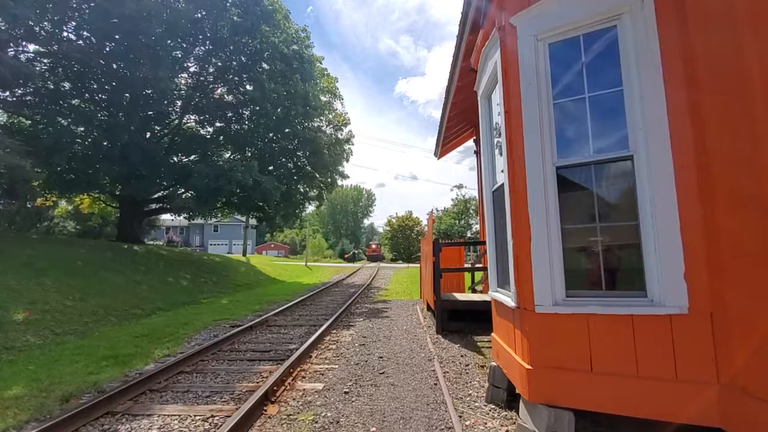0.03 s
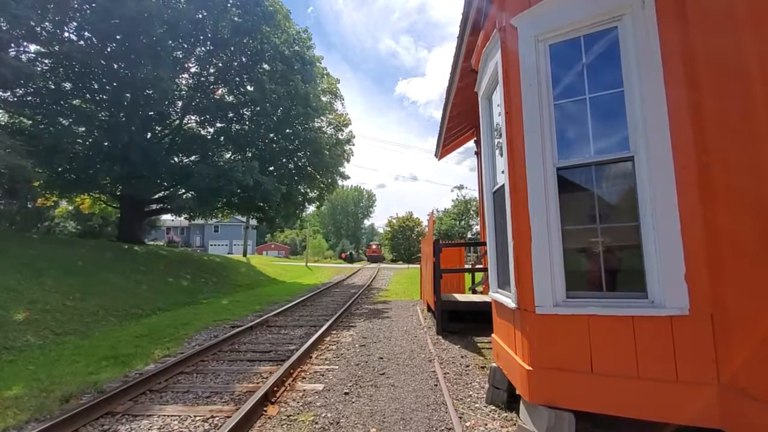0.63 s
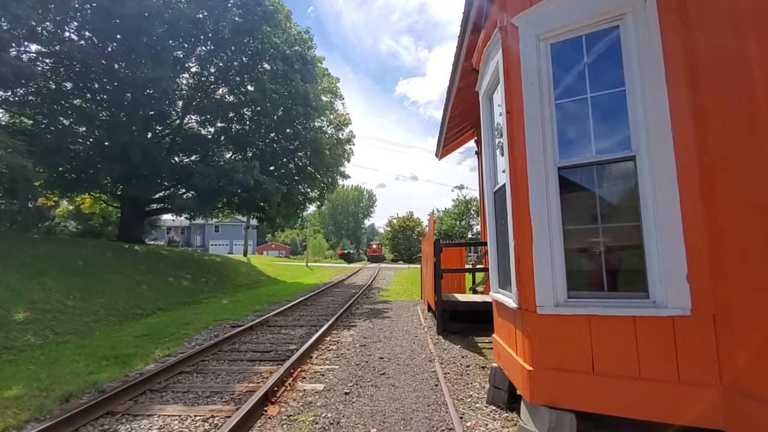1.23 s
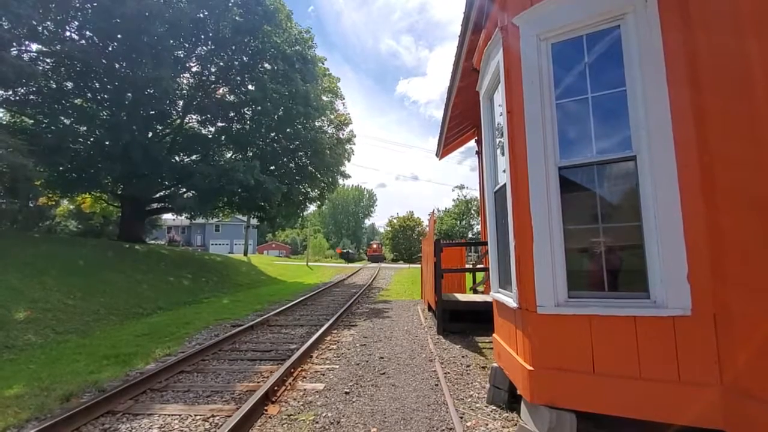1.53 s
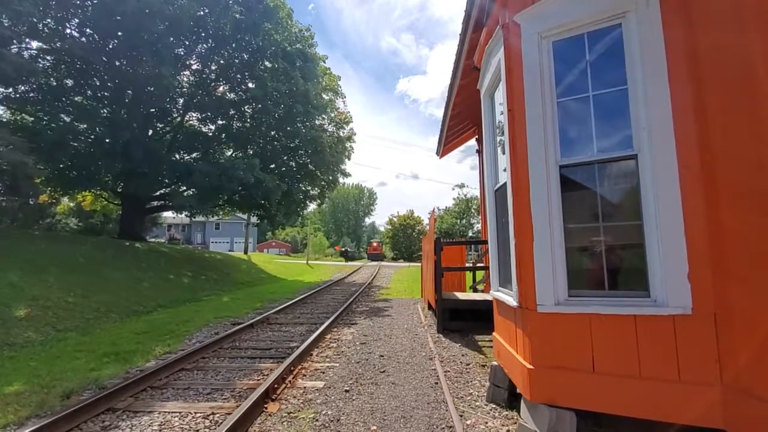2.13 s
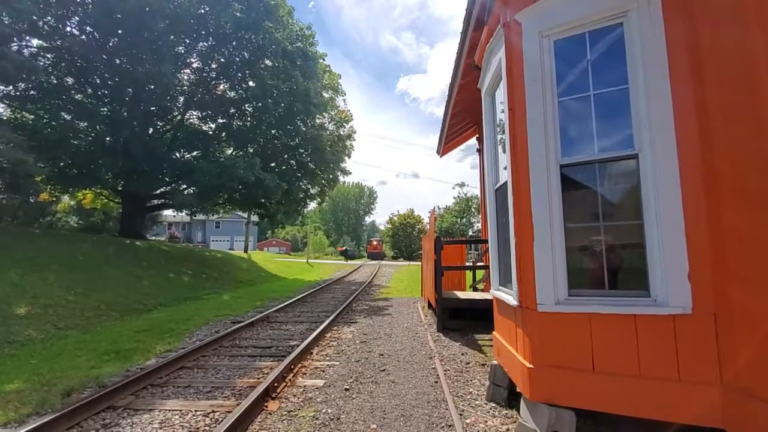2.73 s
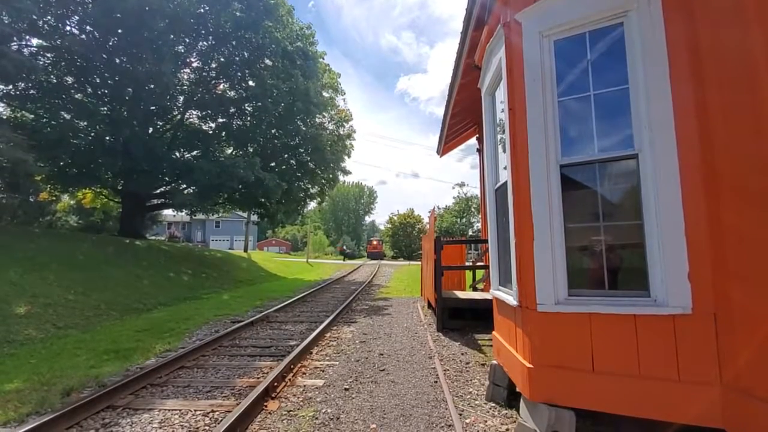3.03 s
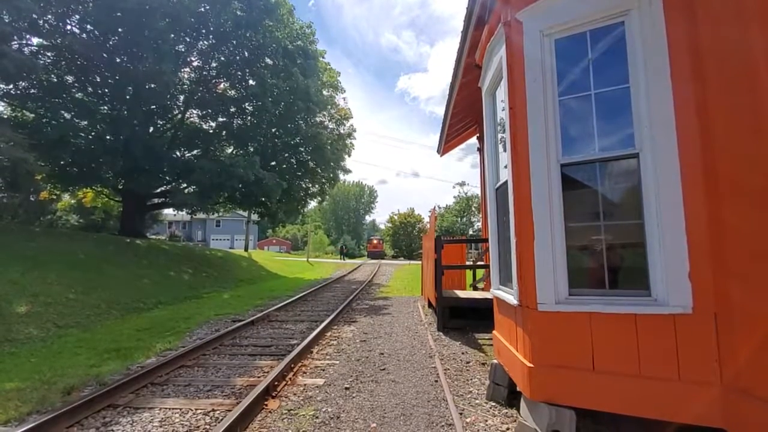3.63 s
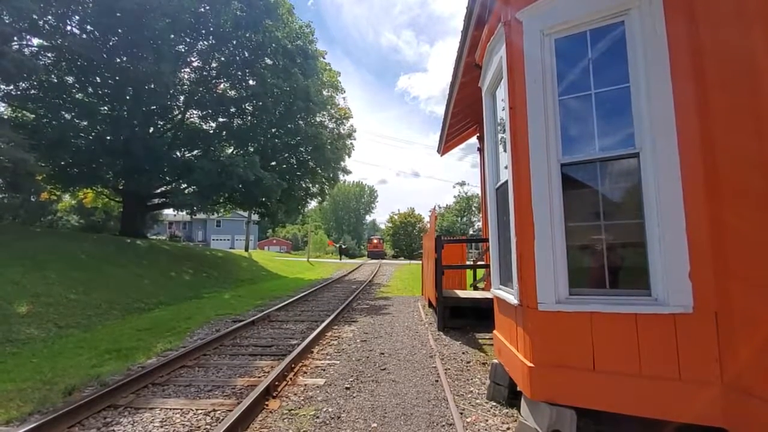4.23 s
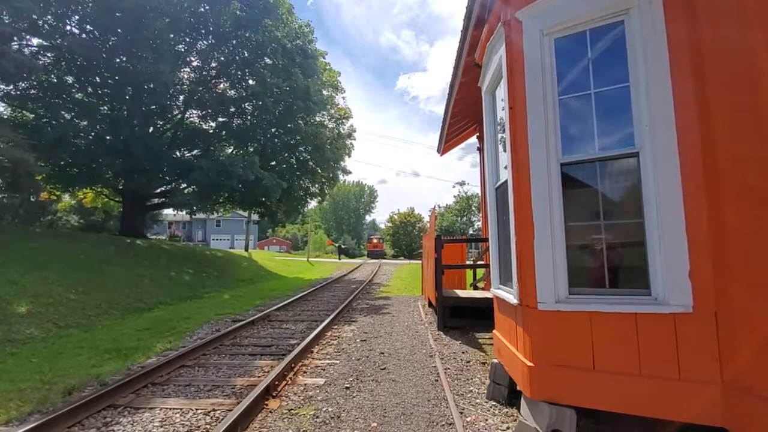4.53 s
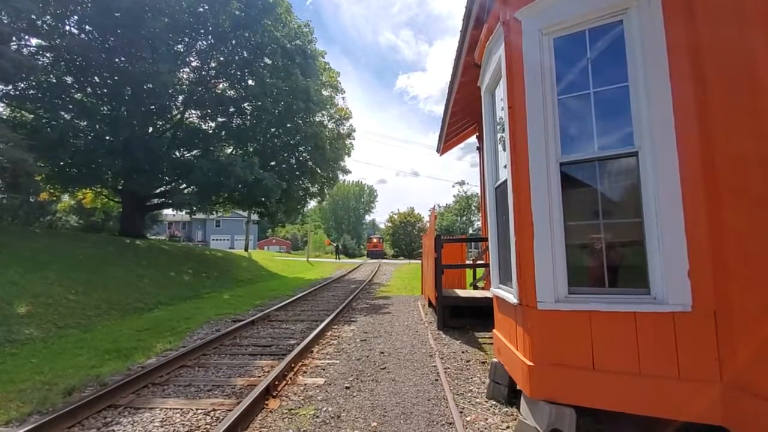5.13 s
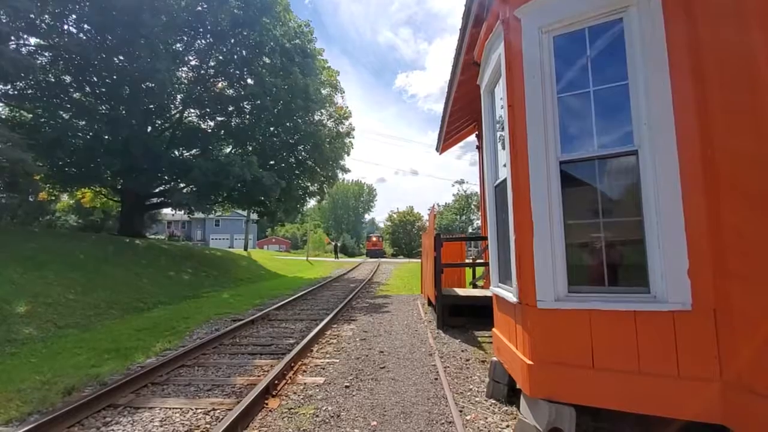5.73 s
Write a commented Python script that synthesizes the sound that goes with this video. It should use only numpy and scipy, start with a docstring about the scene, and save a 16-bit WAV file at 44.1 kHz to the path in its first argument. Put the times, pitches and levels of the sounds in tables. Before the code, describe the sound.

Outdoors beside a railway track, a distant diesel locomotive idles from the start. It makes a quiet, low exhaust rumble with a soft roar and hiss, and a dry tick repeats about four or five times a second. A faint, high rustle comes and goes during the first second, and a few dull knocks sound at around 0.9 and 1.2 seconds. The ticking grows a little stronger near 2.5 seconds.

From about 3.9 seconds the engine takes load and speeds up: the rumble and hiss rise, and the ticks become a rapid spitting. At about 4.6 seconds the train horn sounds a loud five-note chord with a bright, brassy edge and a faint echo from the trees. It is far louder than everything before it. The chord holds at an even level until the end, near 6 seconds, with the engine pushed down beneath it.

```python
"""A far diesel locomotive creeps towards a small wooden station. Its engine idles: exhaust rumble,
roar, hiss and a dry tick every cycle; a faint rustle and a few dull knocks sound early on.
From 3.9 s it takes load and speeds up, and all six cylinders spit. At 4.6 s it sounds a long chord
on a five-chime horn. The loud chord steepens into a brassy edge on its way, and trees and the
station wall scatter it. Gain control holds the chord level and pushes the engine down under it."""
import sys
import numpy as np
from scipy import signal
from scipy.fft import rfft, irfft
from scipy.io import wavfile
from scipy.ndimage import uniform_filter1d

SR = 44100
rng = np.random.default_rng(int(sys.argv[2]) if len(sys.argv) > 2 else 0)


def waveform_to_disk(signal):
    """Save audio, clipped to [-1, 1], as 16-bit WAV at the path in sys.argv[1]."""
    frames = np.transpose(np.atleast_2d(signal))
    scaled = np.clip(frames, -1, 1) * 32767
    samples = np.round(scaled).astype(np.int16)
    wavfile.write(sys.argv[1], SR, samples)


N = 259308
TIME_S = np.arange(N) / SR
EAR_SIGN = np.array([[1], [-1]])

# Stereo width. Each row: frequency in Hz, left-right correlation (clipped to +-1 in use).
CORRELATION = [(100, 2), (280, 0.82), (600, 1.55), (1000, 0.04), (1400, 0.06), (2200, 0.56), (3000, 0.68),
               (4200, 0.4), (6300, -0.1), (13000, 0.5)]
# Stereo tilt. Each row: frequency in Hz, left minus right in dB.
BALANCE_DB = [(150, 1), (330, -0.8), (600, 4), (1000, -3.5), (1400, 5.5), (2200, -1), (2900, -2), (3400, 1),
              (3800, -8.5), (4500, -4), (5300, -2.5), (7000, -3), (9500, -0.5), (12000, 10)]
# Close rustle. Each row: centre in seconds, level in dB, half length in seconds.
RUSTLE_BURSTS = [(0, -61, .035), (0.26, -62, 0.055), (0.756, -66, 0.098), (.99, -54, 0.044)]
# Dull knocks. Each row: centre in seconds, level in dB, pitch in Hz, half length in seconds.
DULL_KNOCKS = [(0.896, -27, 106, 0.016), (.9, -40, 250, .022), (1.156, -40.5, 730, .009)]

# Spectra. Each row: frequency in Hz, relative density in dB.
RUSTLE_DB = [(7000, -13), (9500, 1), (12000, -1), (13800, -5), (15000, -12)]
RUMBLE_DB = [(20, -35.5), (32, -13.5), (42, -9), (54, -3), (68, 0), (90, 1.5), (112, -5.5), (145, -21.5),
             (168, -14), (205, -18), (250, -16), (310, -21.5), (380, -29), (450, -35.5)]
ROAR_DB = [(210, -34.5), (350, -7.5), (475, -11), (596, -1), (690, -4.5), (769, 0), (884, -5), (972, -8),
           (1110, -7), (1200, -15.5), (1440, -6), (1850, -15), (2000, -28), (2600, -42), (4400, -120)]
HISS_DB = [(1060, -41), (1800, -13.5), (2140, 4), (2520, -6), (2920, 3.5), (3180, -2.5), (3780, 2.5),
           (4010, -4), (4300, 1), (4850, 0.5), (6070, -6), (6790, -14), (7660, -29), (10600, -18),
           (14100, -42)]
SPIT_BODY_DB = [(1700, -59), (2150, 4.5), (2550, 1.5), (3000, -0.5), (4200, 7), (5800, 5), (6700, 2),
                (7800, -45.5), (9000, -45)]
SPIT_TOP_DB = [(7500, -23), (9500, -1), (11000, 0.5), (12500, -16), (14500, -36)]
BELL_RUSH_DB = [(230, 2), (300, -2), (400, 0.5), (520, -2.5), (750, -7.5), (1000, -13.5), (1800, -22)]   # air through the horn bells
EDGE_DB = [(500, -12), (1100, -6), (1500, 1), (1850, -16.5), (2200, -2.5), (2500, -8.5), (2700, -2),
           (2950, 2), (3250, -11.5), (3750, 0), (4050, -7.5), (4400, 2), (4700, -12.5), (4950, 4),
           (5150, -11), (5400, -7.5), (6500, -18), (7500, -34), (10800, -24.5), (14000, -44.5)]   # brassy edge of the chord

# Level curves. Each row: time in seconds, relative level in dB.
EXHAUST_CURVE_DB = [(0, -31), (.57, -36), (.85, -30.5), (1.1, -34), (2.7, -33.5), (3.2, -31.5), (3.9, -32)]
CLATTER_CURVE_DB = [(0, 4), (.33, 0.5), (.55, -5.5), (1.0, -1), (1.22, -2), (2.1, 1.5), (2.33, 5.5),
                    (2.55, 9), (2.77, -0.5), (3.0, 3), (3.22, 4.5), (3.45, 0.5), (3.88, 3), (4.1, 3)]   # drives spits and hiss
EDGE_CURVE_DB = [(4.61, -31.5), (4.74, -30), (4.86, -32), (5.03, -27.5), (5.3, -27.5), (5.46, -31),
                 (5.88, -34)]

# Engine speed. Each row: time in seconds, cycle rate in Hz.
CYCLE_RATE_HZ = [(0, 4.535), (1.1, 4.528), (1.6, 4.455), (2.6, 4.534), (4.1, 4.519), (4.4, 4.79),
                 (4.6, 5.3)]
# Hoarse whine at idle, then at full load. Each row: pitch in Hz, level in dB.
WHINE_ENDS = [(765, -59.5), (865, -45.5)]
# Cylinder spits in firing order. Each row: relative level in dB at idle, then under load.
CYLINDER_DB = [(-1.5, 1.5), (-15, -1), (-30, -7), (-10, -1), (-16, -5.5), (-18.5, -9.5)]
# Outlet resonances. Each row: frequency in Hz, relative level in dB, t60 in seconds.
OUTLET_MODES = [(2150, 0, .035), (2950, -10, .022), (3450, -6, .025), (4300, -8, .02), (4950, -6, .022),
                (5900, -5, .025), (6650, -12, .015)]

# Horn chimes. Each row: pitch in Hz, start in seconds, left minus right in dB, right lag in ms.
HORN_CHIMES = [(282.4, 4.572, 0, .05), (327.4, 4.586, -2, 0), (385.0, 4.596, 1, 0), (451.9, 4.640, 8, .48),
               (564.6, 4.594, 0, .03)]
# Chime fundamentals. Each row: relative level in dB, slope in dB per second.
FUNDAMENTAL_DB = [(-19, -0.4), (-21.5, -0.5), (-14, -1.7), (-24, -5), (-24.5, -5)]
# Chime overtones. Each row: harmonic number, then relative level in dB for each of the five chimes.
OVERTONE_DB = [(2, -57.5, -25, -23.5, -30, -32), (3, -55, -29, -33, -29, -38.5),
               (4, -63.5, -37, -38, -47.5, -45), (5, -47.5, -42, -43, -36.5, -38.5),
               (6, -68, -42, -38, -44.5, -49), (7, -60, -47, -48, -53.5, -54.5),
               (8, -70.5, -52, -58.5, -49, -52), (9, -60.5, -58, -56.5, -57.5, -63.5),
               (10, -71.5, -63, -54.5, -50.5, -61), (11, -53.5, -46, -49, -58.5, -65.5),
               (12, -72.5, -46, -60, -55.5, -83.5)]
# Sum tones born where the loud chimes mix. Each row: frequency in Hz, relative level in dB.
MIXING_TONES = [(609.6, -39), (667.2, -45), (712.2, -37), (779.2, -45), (836.8, -42), (1039.5, -39),
                (1221.7, -42), (1433.8, -44), (1456.3, -43), (1605.5, -44), (1991.3, -45), (2020.5, -44)]

ALL_FIRE_LOAD = .32   # load at which every cylinder has joined in


def from_db(db):
    """Decibels to gain."""
    return 10 ** (np.asarray(db) / 20)


def unit_rms(x):
    """Scale to rms 1."""
    return x / np.sqrt(np.mean(x ** 2) + 1e-20)


def at_time(curve, t=TIME_S):
    """Read a table on a time axis."""
    return np.interp(t, *np.transpose(curve))


def at_hz(points, hz):
    """Read a table on a log-frequency axis."""
    known_hz, values = np.transpose(points)
    return np.interp(np.log(np.maximum(hz, 1)), np.log(known_hz), values)


def drift(corner_hz, t=TIME_S):
    """Low-passed random wander, rms about 1."""
    pole = np.exp(-2 * np.pi * corner_hz / 1000)
    slow = signal.lfilter([1], [1, -2 * pole, pole * pole], rng.standard_normal(8000))[2000:]
    return np.interp(t * 1000, np.arange(len(slow)), unit_rms(slow))


def ease(x):
    """Smooth step from 0 to 1."""
    return np.sin(np.pi / 2 * np.clip(x, 0, 1)) ** 2


def burst(centre_s, half_s):
    """Gaussian swell of height 1."""
    return np.exp(-np.minimum(((TIME_S - centre_s) / half_s) ** 2, 50))


def coloured(pair, spectrum):
    """Two unrelated signals to one stereo sound shaped by the spectrum; rms 1."""
    hz = np.arange(N // 2 + 1) * SR / N
    mid, side = rfft(pair)
    out_of_band = np.maximum(spectrum[0][0] / (hz + 1), 1) * np.maximum(hz / spectrum[-1][0], 1)
    alike = np.clip(at_hz(CORRELATION, hz), -1, 1)
    stereo = np.sqrt(1 + alike) * mid + EAR_SIGN * np.sqrt(1 - alike) * side
    gain = from_db(at_hz(spectrum, hz) + EAR_SIGN * at_hz(BALANCE_DB, hz) / 2) / out_of_band ** 10
    return unit_rms(irfft(gain * stereo, N))


def noise(spectrum):
    """Coloured stereo noise, rms 1."""
    return coloured(rng.standard_normal((2, N)), spectrum)


def scatter(x, t60_s):
    """Two unrelated sprays of echoes from leaves, ground and wall; rms 1."""
    t = np.arange(SR // 2) / SR
    echoes = rng.standard_normal((2, len(t))) * from_db(-60 * t / t60_s)
    return unit_rms(signal.fftconvolve(x[None], echoes, axes=1)[:, :N])


def rustle(grain_db=4):
    """Faint, high, grainy bursts in the first second."""
    level = sum(from_db(db) * burst(s, half_s) for s, db, half_s in RUSTLE_BURSTS)
    return level * from_db(grain_db * drift(120)) * noise(RUSTLE_DB)


def knocks(width=1.42, skirt_db=-14):
    """Each dull knock is a brief swell of noise around its pitch."""
    out = np.zeros((2, N))
    for s, db, hz, half_s in DULL_KNOCKS:
        band = [(hz / width, skirt_db), (hz, 0), (hz * width, skirt_db)]
        out += from_db(db) * burst(s, half_s) * noise(band)
    return out


def load(t, throttle_s=3.9, rise_s=.65):
    """Engine load from 0 (idle) to 1 (full)."""
    return np.clip((t - throttle_s) / rise_s, 0, 1)


def sizzle(level_db=-51.5, flicker_db=3, grain_db=3):
    """Thin sizzle of air that comes up with the load."""
    db = level_db + flicker_db * drift(12) + grain_db * drift(120)
    return load(TIME_S) * from_db(db) * noise(SPIT_TOP_DB)


def engine(hum_hz=63.8, hum_db=-7, roar_db=-50.5, approach_db_per_s=.5, hiss_db=-48):
    """Exhaust rumble, one steady low engine hum, whine, nearing roar and hiss; all rise with load."""
    effort = load(TIME_S)
    hum = np.sqrt(2) * np.sin(2 * np.pi * hum_hz * TIME_S + .3 * drift(1))
    rumble = unit_rms(noise(RUMBLE_DB) + from_db(hum_db) * hum)
    exhaust = from_db(at_time(EXHAUST_CURVE_DB) + 3 * effort) * rumble
    whine_hz, whine_db = [np.interp(effort, [0, 1], ends) for ends in np.transpose(WHINE_ENDS)]
    phase = 2 * np.pi * np.cumsum(whine_hz) / SR
    whine = from_db(whine_db) * (drift(30) * np.cos(phase) + drift(30) * np.sin(phase))
    roar = from_db(roar_db + approach_db_per_s * TIME_S + 4.5 * effort) * noise(ROAR_DB)
    restless_db = .54 * at_time(CLATTER_CURVE_DB) + 1.4 * drift(8) + 1.23 * drift(82)
    hiss = from_db(hiss_db + restless_db + 9.5 * effort) * noise(HISS_DB)
    return exhaust + whine + roar + hiss


def firings(first_s=.1122, uneven_db=1.37, up_to_speed_s=4.68, fade_db_per_s=44, max_fade_db=6.5):
    """Cylinders fire in turn, one standing out at idle. Each row: seconds, body dB, top octave dB."""
    cycles = np.cumsum(at_time(CYCLE_RATE_HZ)) / SR
    strokes = len(CYLINDER_DB) * (cycles - np.interp(first_s, TIME_S, cycles))
    stroke = np.arange(int(strokes[-1]))
    start_s = np.interp(stroke, strokes, TIME_S)
    effort = load(start_s)
    idle_db, loaded_db = np.array(CYLINDER_DB)[stroke % len(CYLINDER_DB)].T
    db = idle_db + np.minimum(effort / ALL_FIRE_LOAD, 1) * (loaded_db - idle_db)
    db += uneven_db * rng.standard_normal(len(stroke))
    db -= np.clip(fade_db_per_s * (start_s - up_to_speed_s), 0, max_fade_db)
    clatter_db = at_time(CLATTER_CURVE_DB, start_s)
    body_db = -31.5 + db + clatter_db + 4 * effort
    top_db = -47 + db + .1 * clatter_db + 11.5 * effort
    return list(zip(start_s, body_db, top_db))


def outlet_ring(puff, knock_db, spread_db=3.5):
    """A turbulent puff rings the outlet's modes at random strengths; the lowest one knocks."""
    age_s = TIME_S[:SR // 20]
    hz, db, t60_s = np.transpose(OUTLET_MODES)[:, :, None]
    db = db + spread_db * rng.standard_normal(db.shape) + knock_db * (hz == hz.min())
    modes = np.sum(from_db(db - 60 * age_s / t60_s) * np.sin(2 * np.pi * hz * age_s), axis=0)
    turbulence = rng.standard_normal(len(puff)) + .5 * rng.standard_normal((2, len(puff)))
    turbulence = signal.sosfilt(signal.butter(4, 1800, "high", fs=SR, output="sos"), turbulence)
    ring = signal.fftconvolve(puff * turbulence, modes[None], axes=1)[:, :len(puff)]
    return ring / np.abs(ring).max()


def spits(rise_s=.0014, hold_s=.0064, fall_s=.0032, tail_s=.025, tail_db=-17):
    """Each spit: milliseconds of rushing air, a short ring and a short outdoor tail."""
    body, top, ring = np.zeros(N), np.zeros(N), np.zeros((2, N))
    stray_spit = (.1507, -31.5, -51)
    for start_s, body_db, top_db in [stray_spit] + firings():
        first = int(start_s * SR)
        age_s = TIME_S[:min(SR // 5, N - first)]
        span = slice(first, first + len(age_s))
        attack = ease(age_s / rise_s)
        puff = attack * np.exp(-np.maximum(age_s - hold_s, 0) / fall_s)
        envelope = puff + attack * from_db(tail_db) * np.exp(-age_s / tail_s)
        body[span] += from_db(body_db - 10) * envelope
        top[span] += from_db(top_db - 5) * envelope
        ring_db = body_db + np.interp(body_db, [-32, -24], [-3, 0])   # hard spits ring more
        knock_db = np.interp(load(start_s), [0, ALL_FIRE_LOAD], [-8, 2])
        ring[:, span] += from_db(ring_db) * outlet_ring(puff, knock_db)
    return body * noise(SPIT_BODY_DB) + top * noise(SPIT_TOP_DB) + ring


def shock_fronts(pressure, steepness=14.2, tail_db=-5):
    """Each rise of the summed wave sharpens to a front: a dense comb of mixing tones, scattered."""
    fronts = np.maximum(np.diff(np.tanh(steepness * pressure), prepend=0), 0)
    fronts = signal.sosfilt(signal.butter(2, 900, "high", fs=SR, output="sos"), fronts)
    scattered = scatter(fronts, t60_s=.015) + from_db(tail_db) * scatter(fronts, t60_s=.95)
    return coloured(scattered, EDGE_DB)


def partial(phase, hz, t, width=.9, waver_at_1khz=.18):
    """One line of the chord; moving air makes it waver, more so the higher it is."""
    offset_rad = width * np.arccos(np.clip(at_hz(CORRELATION, hz), -1, 1)) / 2 * rng.choice([-1, 1])
    waver = waver_at_1khz * np.sqrt(hz / 1000)
    amplitude = np.sqrt(2) * (1 + waver * drift(1.7, t))
    wave = amplitude * np.cos(phase + EAR_SIGN * offset_rad + waver * drift(13, t))
    return wave * from_db(EAR_SIGN * at_hz(BALANCE_DB, hz) / 2)


def fundamental(phase, hz, pan_db, lag_ms):
    """A chime's lowest line; the wall's reflection makes it differ between the ears."""
    sides = unit_rms(from_db(EAR_SIGN * pan_db / 2))
    lag_s = np.array([[0], [lag_ms / 1000]])
    return np.sqrt(2) * sides * np.cos(phase - 2 * np.pi * hz * lag_s)


def horn(flat=.05, settle_s=.0219, jitter=.00063, attack_s=.032, bloom_s=.021, sag_db_per_s=3.5,
         partial_db=.5, rush_db=-42, blast_db=11, shortfall_db=4, fill_s=.22):
    """Five reeds start in turn, flat, and rise to pitch as pressure builds; overtones bloom later."""
    on = TIME_S > HORN_CHIMES[0][1]
    t = TIME_S[on]
    held_s = t - t[0]
    sag_db = -sag_db_per_s * held_s   # the held chord mellows
    edge_db = at_time(EDGE_CURVE_DB, t)
    high_swell_db = edge_db - edge_db.mean() + sag_db.mean()
    low_swell_db = sag_db + 2 * burst(4.73, half_s=.08)[on]   # flare after the attack
    chord, pressure = np.zeros((2, N)), np.zeros(N)
    for i, (hz, start_s, pan_db, lag_ms) in enumerate(HORN_CHIMES):
        db, db_per_s = FUNDAMENTAL_DB[i]
        age_s = np.maximum(t - start_s, 0)
        pitch_hz = hz * (1 - flat * np.exp(-age_s / settle_s) + jitter * drift(12, t))
        phase = 2 * np.pi * np.cumsum(pitch_hz) / SR
        attack = ease(age_s / attack_s)
        chord[:, on] += from_db(db + db_per_s * age_s) * attack * fundamental(phase, hz, pan_db, lag_ms)
        pressure[on] += attack * np.cos(phase) / len(HORN_CHIMES)
        for k, *chime_db in OVERTONE_DB:
            high = np.interp(k * hz, [1200, 2400], [0, 1])
            swell_db = high * high_swell_db + (1 - high) * low_swell_db
            bloom = ease(age_s / (attack_s + bloom_s * (k - 1)))
            gain = from_db(chime_db[i] + swell_db + partial_db) * bloom
            chord[:, on] += gain * partial(k * phase, k * hz, t)
    onset = ease((t - 4.59) / .057)
    for hz, db in MIXING_TONES:
        chord[:, on] += from_db(db + partial_db + sag_db) * onset * partial(2 * np.pi * hz * t, hz, t)
    chord[:, on] += from_db(edge_db) * onset * unit_rms(shock_fronts(pressure)[:, on])
    chord[:, on] += from_db(rush_db + sag_db) * onset * noise(BELL_RUSH_DB)[:, on]
    chord[:, on] *= from_db(blast_db - shortfall_db * np.exp(-held_s / fill_s))   # air fills the horn
    return chord


def scene(echo_db=-23):
    """The horn and its faint echo from the trees, over the engine, rustle and knocks."""
    chord = horn()
    trees = from_db(echo_db) * np.std(chord) * scatter(chord.mean(axis=0), t60_s=.98)
    return chord + trees + engine() + spits() + sizzle() + rustle() + knocks()


def gain_control(x, ceiling_db=-9, settled_db=-11.5, settle_s=.36, release_db_per_s=8):
    """A fast limiter holds the level under a ceiling; a slow stage eases it further down."""
    level_db = 10 * np.log10(uniform_filter1d(np.mean(x ** 2, axis=0), size=SR // 40) + 1e-12)
    release_db = release_db_per_s * TIME_S
    held_db = np.maximum.accumulate(level_db + release_db) - release_db
    fast_db = np.maximum(held_db - ceiling_db, 0)
    pole = np.exp(-1 / (settle_s * SR))
    slow_db = signal.lfilter([1 - pole], [1, -pole], np.maximum(held_db - fast_db - settled_db, 0))
    return x * from_db(-fast_db - slow_db)


def record(dry, stopband_hz=15500):
    """Gain control, clipping at full scale, steep low-pass."""
    lowpass = signal.cheby2(12, 60, stopband_hz, fs=SR, output="sos")
    return signal.sosfilt(lowpass, np.clip(gain_control(dry), -1, 1))


dry = scene()
out = record(dry)
waveform_to_disk(out)
```